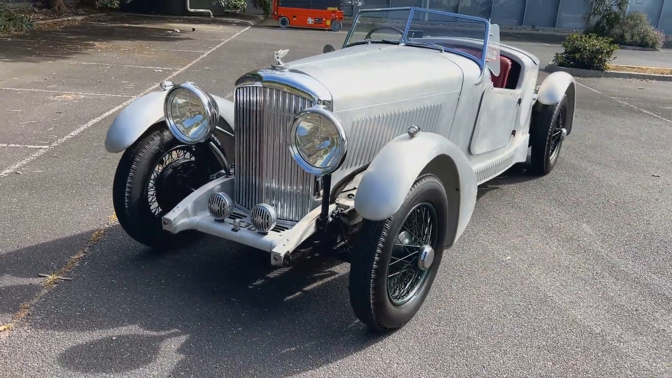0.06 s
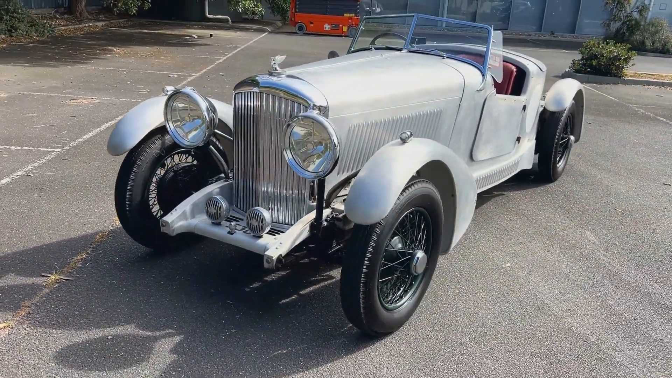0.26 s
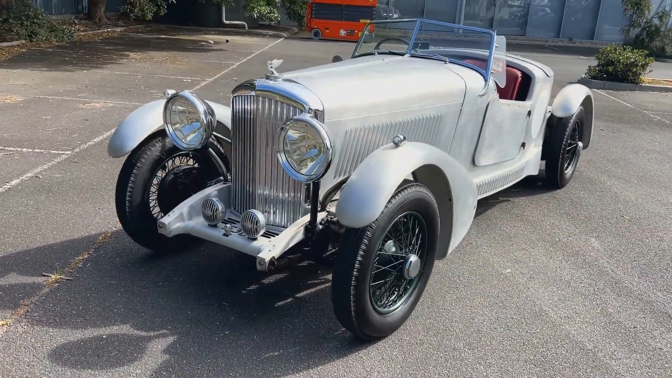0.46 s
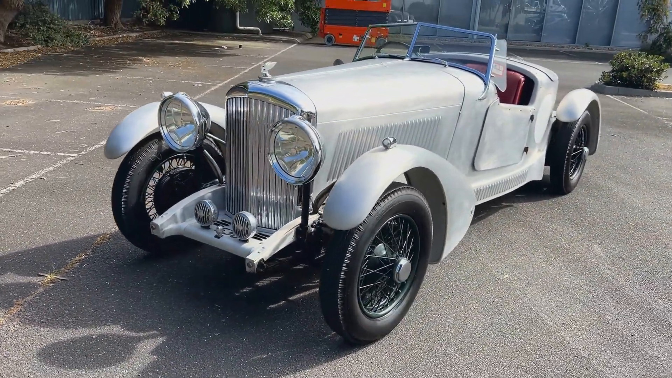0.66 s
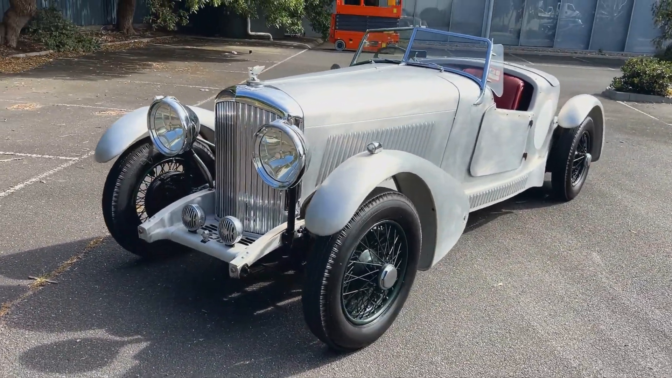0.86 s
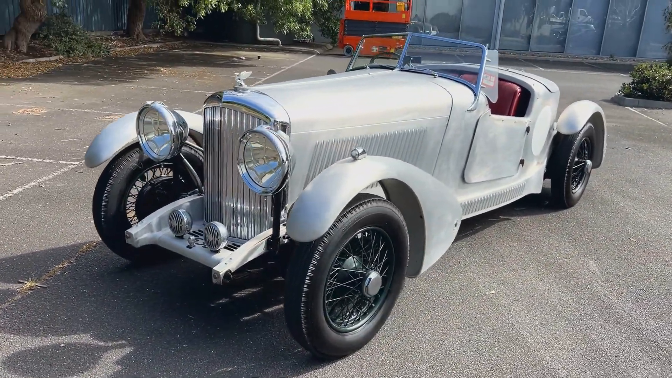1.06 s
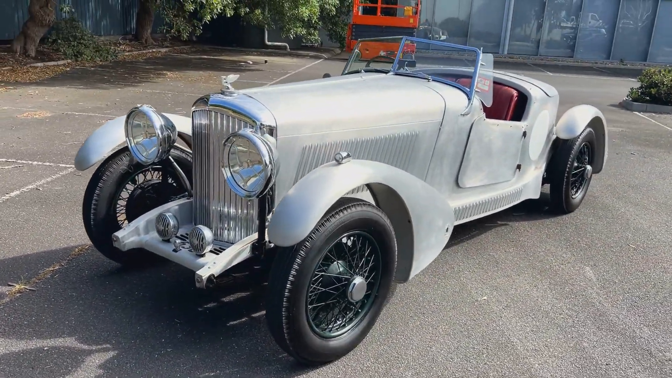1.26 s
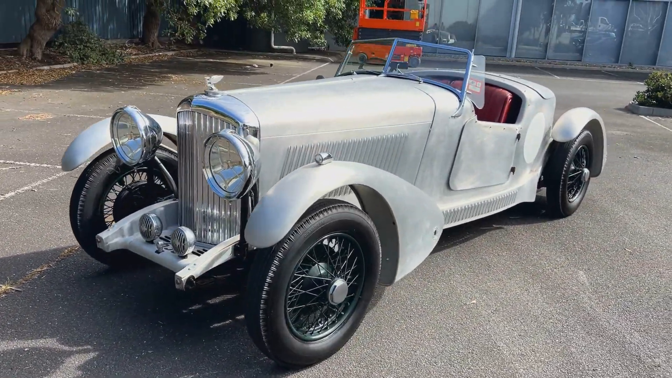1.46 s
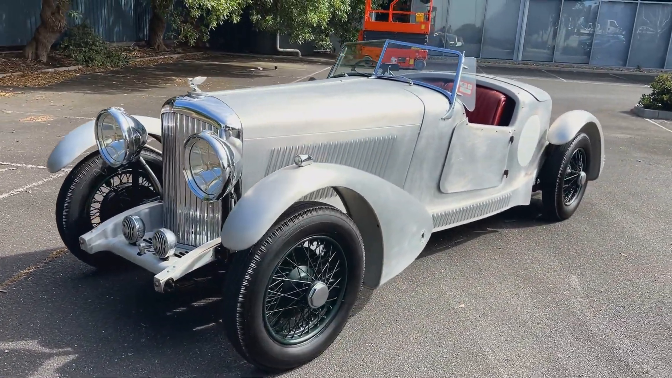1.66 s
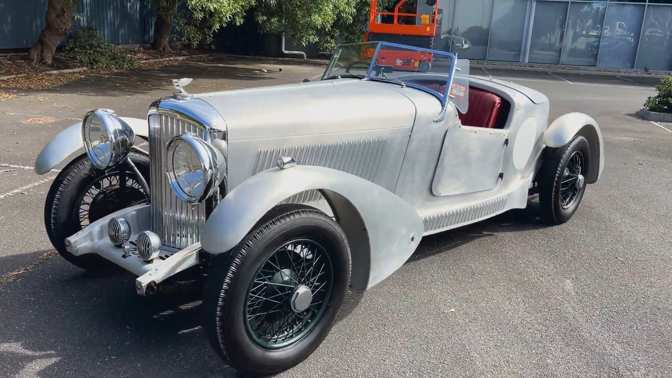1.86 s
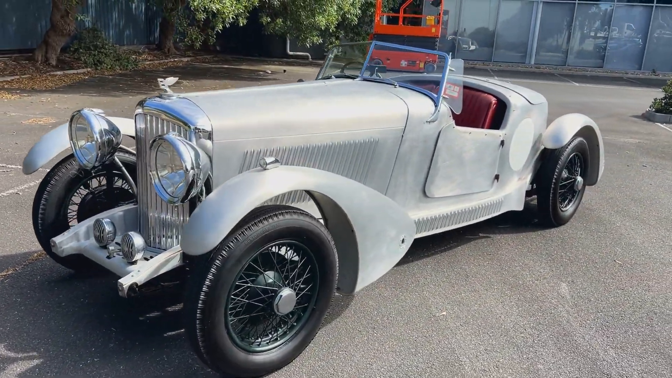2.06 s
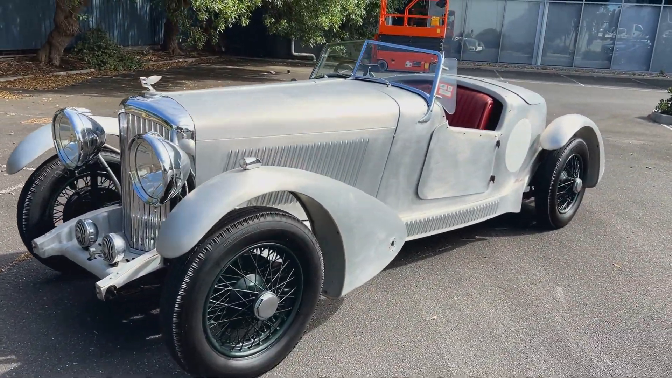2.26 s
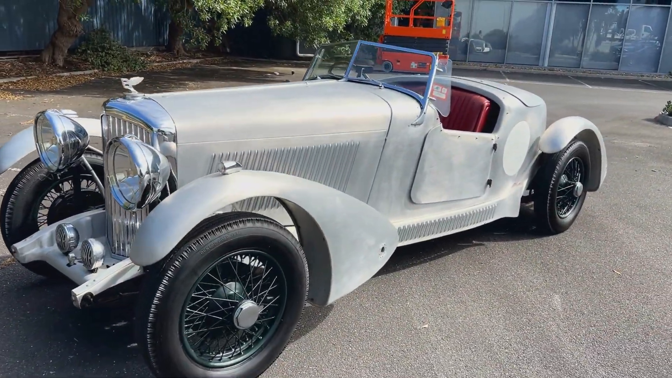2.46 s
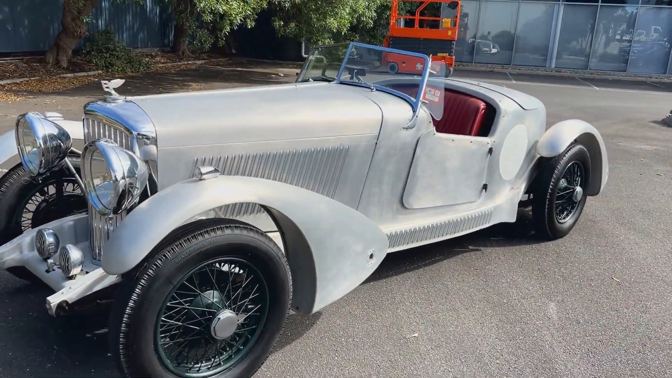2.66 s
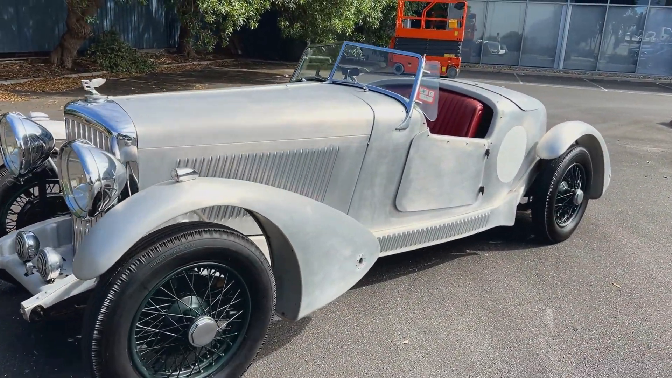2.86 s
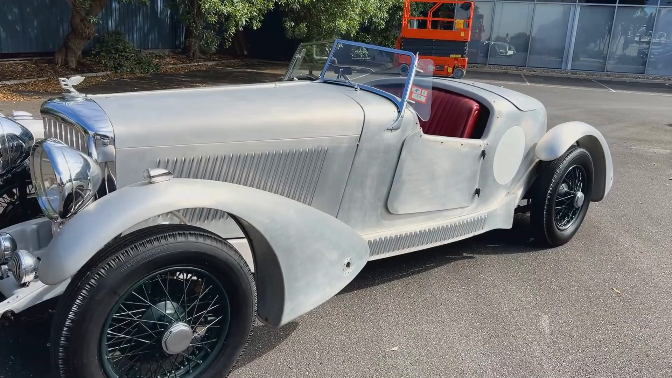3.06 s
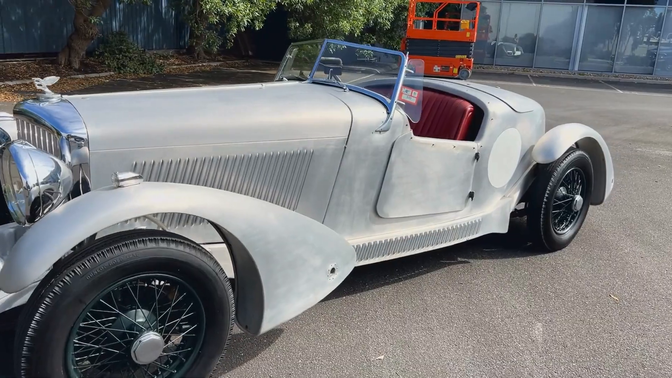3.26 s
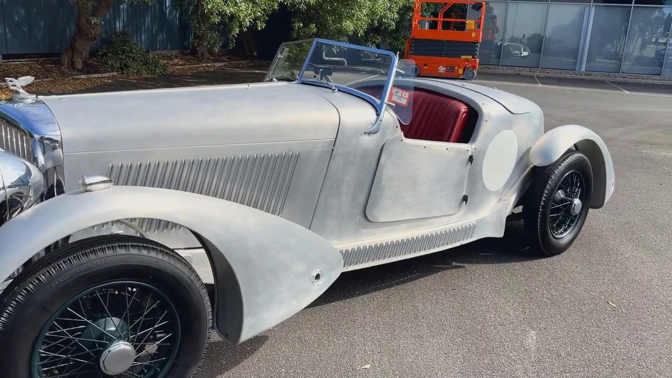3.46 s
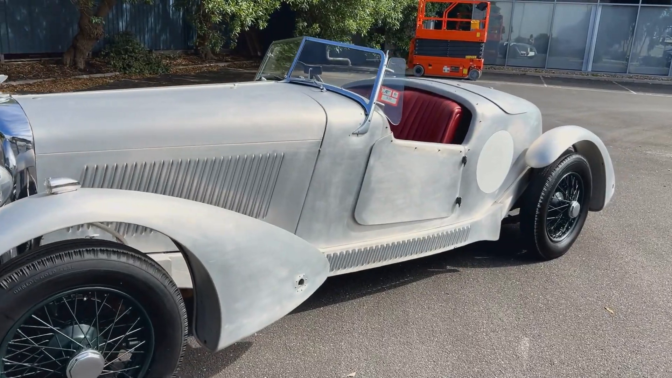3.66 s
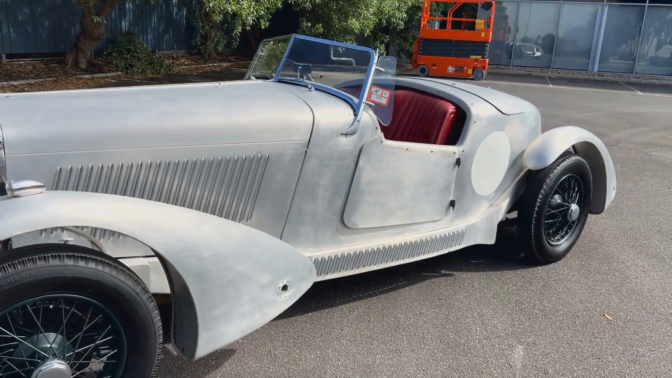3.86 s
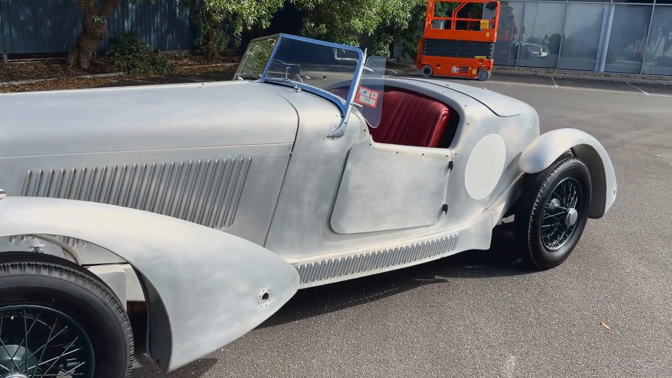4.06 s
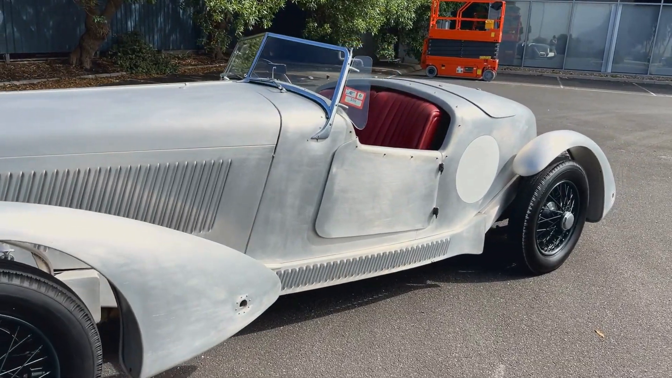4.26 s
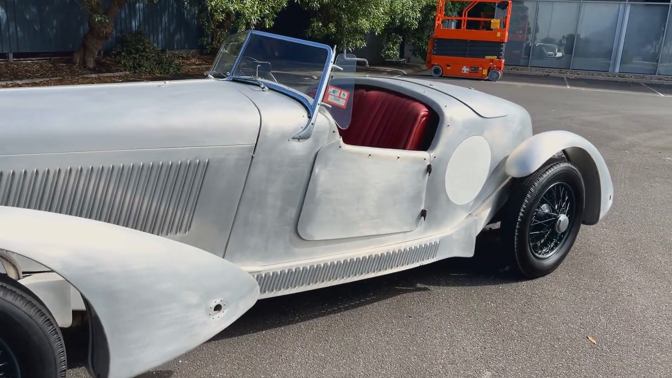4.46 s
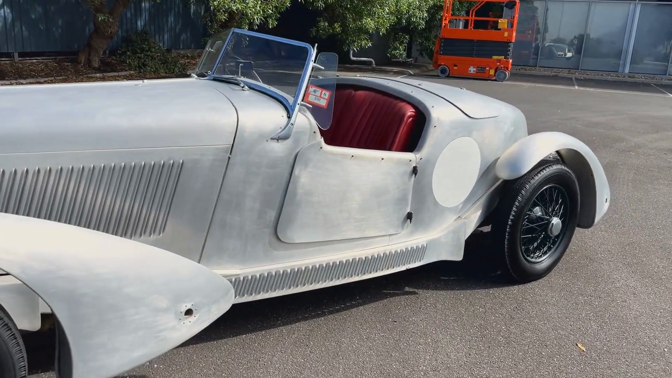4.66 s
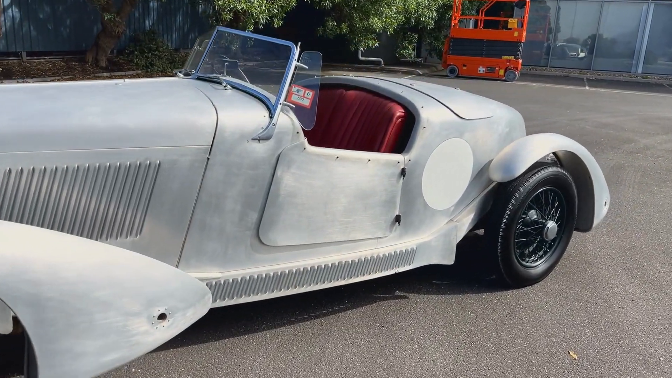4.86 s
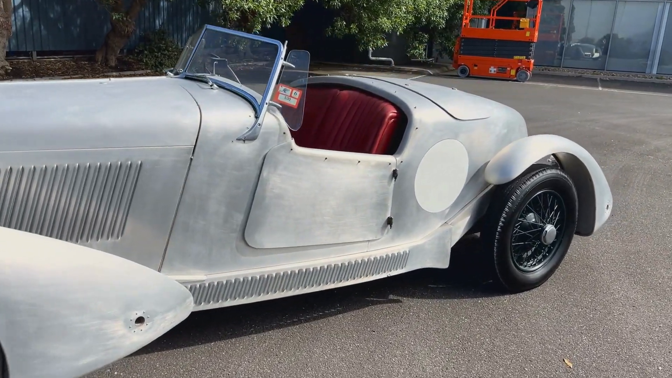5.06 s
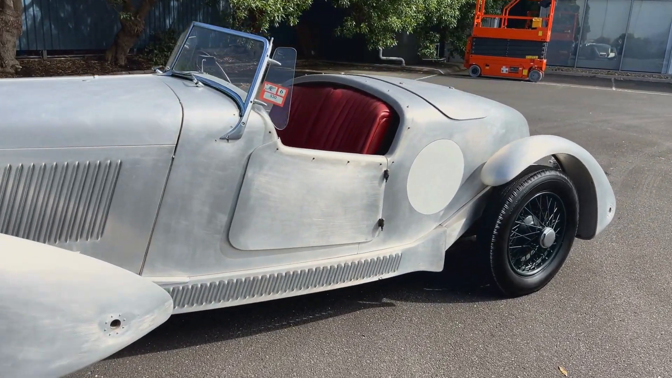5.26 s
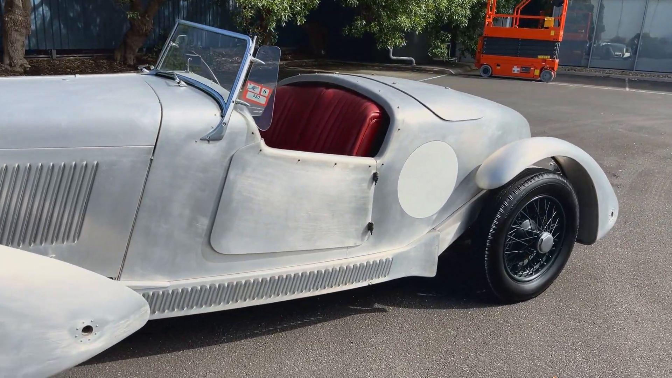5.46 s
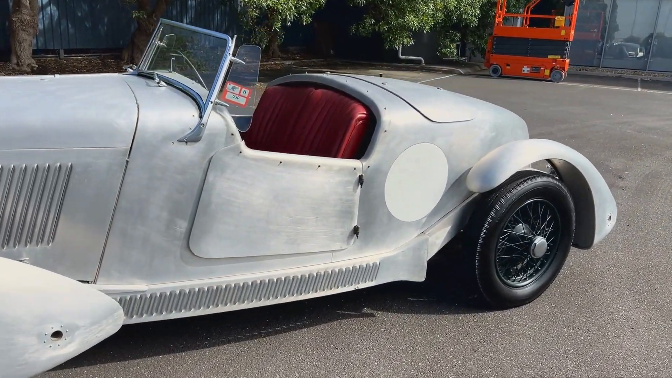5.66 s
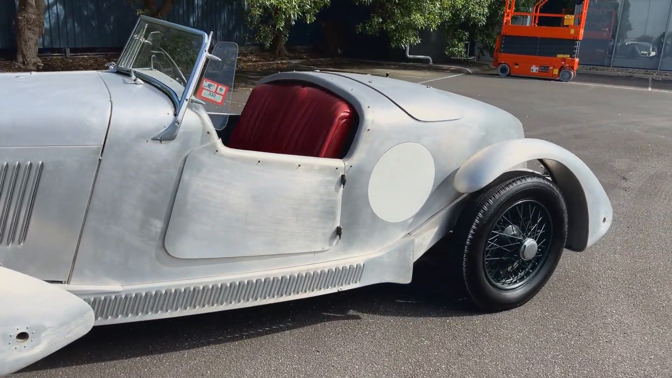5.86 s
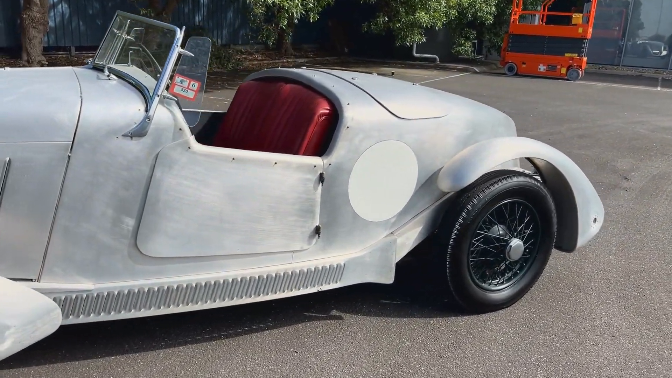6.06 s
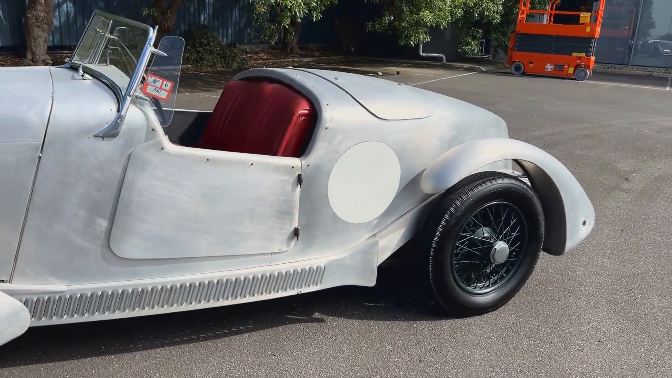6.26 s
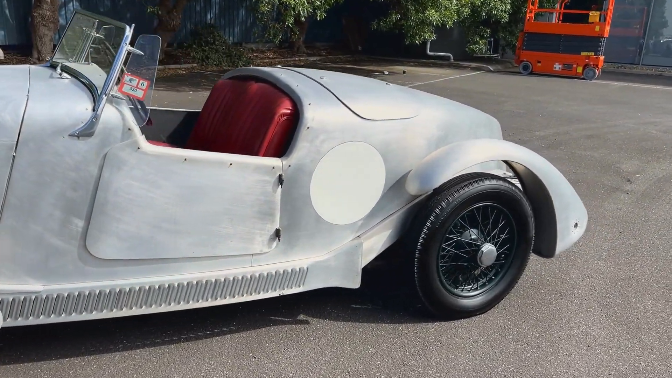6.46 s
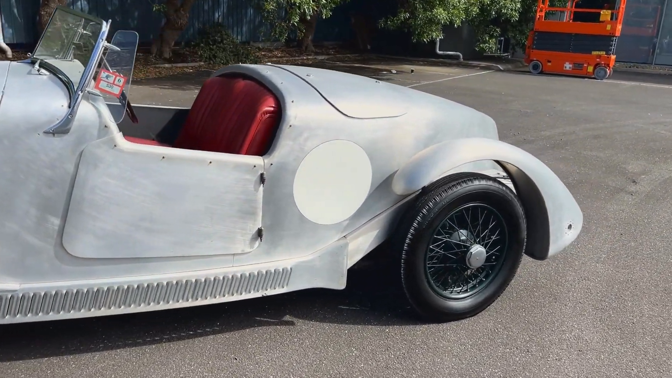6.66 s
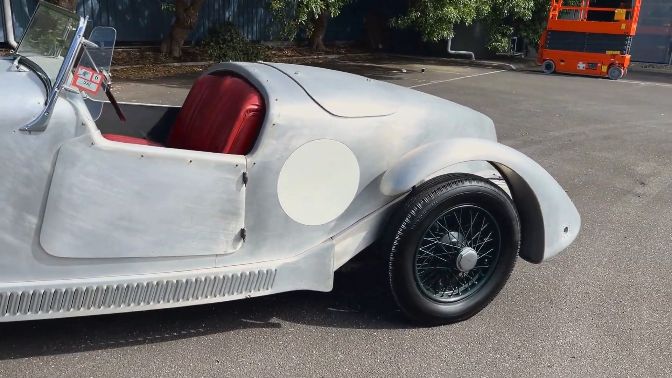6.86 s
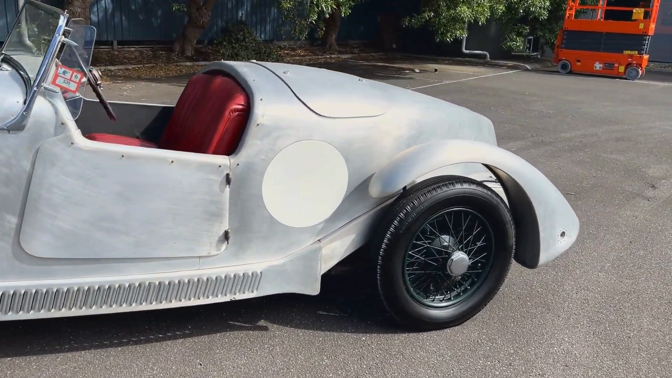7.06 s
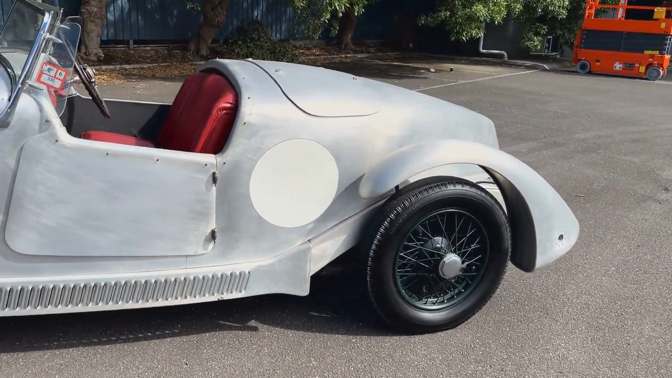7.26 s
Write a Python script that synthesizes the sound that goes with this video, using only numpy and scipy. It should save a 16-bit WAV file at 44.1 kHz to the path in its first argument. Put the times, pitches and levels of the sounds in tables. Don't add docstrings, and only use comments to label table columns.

```python
import sys
import numpy as np
from scipy import signal
from scipy.fft import rfft, irfft, next_fast_len
from scipy.io import wavfile
from scipy.ndimage import map_coordinates

SR = 44100
rng = np.random.default_rng(int(sys.argv[2]) if len(sys.argv) > 2 else 0)


def store_wav(level_fs):
    pcm = np.round(np.clip(np.atleast_2d(level_fs), -1, 1) * 32767)
    wavfile.write(sys.argv[1], SR, pcm.T.astype(np.int16))


def rack_gain(trim_db):
    fader = np.asarray(trim_db, float)
    return 10 ** (fader / 20)


N = 322371


def unit(x):
    return x / np.sqrt(np.mean(x ** 2) + 1e-20)


def along(points, hz):
    f, v = np.transpose(points)
    return np.interp(np.log(hz + 1), np.log(f + 1), v)


def curves(rows):
    s, *columns = np.transpose(rows)
    return [np.interp(np.arange(N) / SR, s, column) for column in columns]


def wobble(rate):
    knots = rng.standard_normal(int(N * rate / SR) + 4)
    return map_coordinates(knots, [np.arange(N) * rate / SR])


def bumps(times, sizes_db, lengths):
    t = np.arange(N) / SR
    events = np.broadcast(times, sizes_db, lengths)
    return sum(db * np.exp(-((t - s) / length) ** 2) for s, db, length in events)


def filtered(x, response):
    m = next_fast_len(N + SR // 2)
    return irfft(rfft(x, m) * response(np.fft.rfftfreq(m, 1 / SR)), m)[..., :N]


def causal(spectrum):
    def response(hz):
        cepstrum = irfft(np.log(rack_gain(along(spectrum, hz)) + 1e-6))
        half = len(cepstrum) // 2
        cepstrum[1:half] *= 2
        cepstrum[half + 1:] = 0
        return np.exp(rfft(cepstrum))
    return response


# (frequency [Hz], correlation [-1 to 1])
PORT_COHERENCE = [(60, 1), (300, 0.98), (640, 0.79), (1100, 0.95), (1900, 1), (4000, 0.97), (7000, 1),
                  (15000, .75)]


def rush(spectrum, gate, alike=PORT_COHERENCE):
    def shape(hz):
        angle = np.arccos(np.clip(along(alike, hz), -1, 1)) / 2
        colour = rack_gain(along(spectrum, hz)) * (hz > spectrum[0][0])
        return colour * [np.cos(angle), np.sin(angle)]

    mid, side = filtered(gate * rng.standard_normal((2, N)), shape)
    return unit(np.array([mid + side, mid - side]))


# (time [s], level [dB])
BREEZE_LEVEL = [(0, -55.5), (1.3, -60), (2.5, -55), (3.3, -51), (5, -49.5), (5.7, -44), (6.5, -41),
                (7.31, -35)]
# (time [s], lift common to both ports [dB], lift differing between ports [dB])
GUST_LIFTS = [(.6, 4, 3), (1.25, 7, -3), (1.8, 7, 5), (2.25, 4, 9), (2.55, 10, 5), (2.85, 11.5, -1),
              (3.05, 10, 3), (3.25, 5, 6), (3.4, 2, 8), (3.65, -1, 8.5), (3.85, -1, 7), (4.13, 4, 16),
              (4.35, 3, -2), (4.46, 4, 6), (4.75, 1, 9), (5.0, 5, 4), (5.25, 13, 3.5), (5.45, 3, 0),
              (5.7, 6, -5), (5.95, 8, -6), (6.15, 9, 6), (6.45, 5, -7), (6.63, 6.5, -6), (6.87, 10, 3),
              (6.95, 5.5, 3), (7.05, 9.5, 5), (7.15, -2, -5)]
# (frequency [Hz], density [dB per Hz])
COMMON_SPECTRUM = [(15, -45), (30, -19), (52, 0), (70, -2), (95, -10), (140, -15), (300, -36), (3000, -120)]
# (frequency [Hz], density [dB per Hz])
DIFFERING_SPECTRUM = [(15, -51.5), (30, -26), (55, -5.5), (75, -8), (110, -6.5), (160, -10), (300, -26.5),
                      (700, -70), (3000, -120)]


def buffeting():
    (breeze_db,), (times, common_lift, differing_lift) = curves(BREEZE_LEVEL), np.transpose(GUST_LIFTS)
    gust_s, differing_db = .07, -0.5
    common_db = breeze_db + bumps(times, common_lift, gust_s)
    differing_db = breeze_db + differing_db + bumps(times, differing_lift, gust_s)
    common = rack_gain(common_db + 5.5) * rush(COMMON_SPECTRUM, rack_gain(3 * wobble(14)), [(50, 1)])
    differing = rack_gain(differing_db + 1.5) * rush(DIFFERING_SPECTRUM, rack_gain(3 * wobble(14)), [(50, -.7)])
    return common + differing


# (time [s], peak level [dB], start frequency [Hz], end frequency [Hz], length [s])
SNAPPING_EDDIES = [(3.032, -29, 430, 90, 0.018), (3.047, -22, 77.5, 54.5, 0.036),
                   (4.732, -43, 452, 150, 0.026), (5.198, -28, 395, 120, 0.016),
                   (5.234, -24, 470, 110, 0.015), (5.954, -32, 90, 50, 0.044),
                   (6.81, -15.5, 540, 93, 0.0187), (6.819, -17.5, 115, 95, .012),
                   (6.865, -20, 80.5, 45.4, 0.037), (6.953, -29, 400, 130, 0.013),
                   (6.975, -24, 395, 109, 0.019), (7.061, -22.5, 500, 110, 0.015)]


def flutter():
    snaps = np.zeros(N + SR)
    for s, db, start_hz, end_hz, length in SNAPPING_EDDIES:
        u = np.arange(round(length * SR)) / (length * SR)
        pitch_hz = start_hz * (end_hz / start_hz) ** u
        swell = np.sin(np.pi * u ** .7)
        snaps[round(s * SR):][:len(u)] += rack_gain(db) * swell * np.sin(-2 * np.pi * np.cumsum(pitch_hz) / SR)
    return snaps[:N]


def yard_echoes(song):
    lag = np.arange(SR // 4) / SR
    echoes = rng.standard_normal((2, len(lag))) * rack_gain(-60 * lag / 0.35) * (lag > .006)
    echoes = echoes[0] + [[.25], [-.25]] * echoes[1]
    response = echoes / np.linalg.norm(echoes[0])
    return rack_gain(-3) * signal.fftconvolve(song[None], response, axes=1)[:, :N]


# (time [s], frequency [Hz], level [dB])
RISING_CHIRPS = [
    [(0.112, 4350, -80.5), (0.13, 4920, -59), (0.15, 6420, -61), (0.159, 6560, -63)],
    [(5.978, 4875, -60), (5.988, 5330, -49), (6.012, 6590, -49.5), (6.015, 6400, -66)],
]
# (multiple of the syrinx pitch, level [dB])
SYRINX_PARTIALS = [(1, -3.5), (2, 0), (3, -17), (4, -22), (5, -24)]
# (time [s], length [s], start frequency [Hz], end frequency [Hz], level [dB])
SHORT_PEEPS = [(0.148, 0.02, 3250, 3300, -53.5), (0.16, 0.012, 3750, 3600, -58),
               (6.006, 0.019, 3170, 3330, -51), (6.018, 0.014, 4060, 3750, -52),
               (6.322, 0.014, 3150, 3600, -48), (6.33, 0.016, 4380, 3930, -49),
               (6.345, 0.0086, 3940, 4350, -51), (6.372, 0.011, 4230, 3860, -58),
               (6.482, 0.012, 4400, 4300, -56), (6.551, .02, 3950, 3830, -54),
               (6.646, .02, 3570, 3740, -57)]


def bird():
    song, t = np.zeros(N), np.arange(N) / SR
    for rows in RISING_CHIRPS:
        hz, db = curves(rows)
        fade = np.clip(np.minimum(t - rows[0][0], rows[-1][0] - t) / 0.0012, 0, 1)
        phase = np.pi * np.cumsum(hz) / SR
        voice = sum(rack_gain(level) * np.sin(k * phase) for k, level in SYRINX_PARTIALS)
        song += fade * rack_gain(db + 6.5 + 1.9 * wobble(220)) * voice
    for s, length, start_hz, end_hz, db in SHORT_PEEPS:
        u = np.clip((t - s) / length, 0, 1)
        cycles = length * u * (start_hz + (end_hz - start_hz) * u / 2)
        song += rack_gain(db) * np.sin(np.pi * u) * np.sin(2 * np.pi * cycles)
    return song + yard_echoes(song)


# (frequency [Hz], density [dB per Hz])
BONNET_SPECTRUM = [(500, -25), (900, -1), (1700, 0), (2150, -6.5), (2380, 1.5), (2600, -8.5), (3500, -22)]


def bonnet():
    return rack_gain(-69.5 + 1.7 * wobble(2.5)) * rush(BONNET_SPECTRUM, 1)


def heard(drone_db, close_db, growth, bonnet_db):
    return np.hypot(rack_gain(close_db + growth * (drone_db + 16)), rack_gain(bonnet_db))


def escape(crank, sizes_db, steady, scatter_db=1.5, lead=0.093, life=0.24):
    firing, part = np.divmod(crank + lead, 1)
    firing = firing.astype(int)
    scatter = scatter_db * rng.standard_normal(N // 900)[firing + 2]
    size_db = np.take(sizes_db, firing, mode="wrap") + scatter
    return steady + rack_gain(size_db) * part / life * np.exp(1 - part / life)


HISS_OF_CYLINDER = [-4.5, 1.5, 0.5, -0.5, 3.5, -7]
# (frequency [Hz], density [dB per Hz])
HISS_SPECTRUM = [(4000, -38.5), (5500, -3.5), (8300, 3), (9300, -6), (9500, 1.5), (9720, 1), (10900, -9.5),
                 (11000, -1), (11150, -6), (12400, -10.5), (15600, -15)]


def hiss(crank, drone_db):
    flow = escape(crank, HISS_OF_CYLINDER, steady=1.3, scatter_db=1.2)
    gain = heard(drone_db, close_db=-57, growth=1.42, bonnet_db=-76.5)
    return gain * rack_gain(-3.0) * rush(HISS_SPECTRUM, flow)


CHUFF_OF_CYLINDER = [4.5, 7.5, 6.5, 9, 6, -1.5]
# (frequency [Hz], density [dB per Hz])
CHUFF_SPECTRUM = [(1200, -6.5), (2000, -8.5), (2150, -2.5), (2390, 2.5), (2620, -2), (2900, -1.5),
                  (3500, -8), (4100, -8), (5000, -14), (6500, -20), (12000, -59)]


def chuffs(crank, drone_db):
    flow = escape(crank, CHUFF_OF_CYLINDER, steady=0.94, scatter_db=1.2)
    gain = heard(drone_db, close_db=-52.5, growth=0.81, bonnet_db=-68)
    return gain * rack_gain(-0.5) * rush(CHUFF_SPECTRUM, flow)


FIRING_STRENGTH = [.5, 1.2, .8, -.6, -1.2, -.4]
# (frequency [Hz], density [dB per Hz])
ROAR_SPECTRUM = [(90, -29), (130, 1.5), (300, -5), (430, -15), (530, -13.5), (700, -21.5), (860, -19.5),
                 (1020, -25), (1280, -27), (1480, -29.5), (1680, -27.5), (1900, -32), (3000, -49),
                 (9000, -100)]


def roar(crank, drone_db):
    flow = escape(crank, FIRING_STRENGTH, steady=6.4, lead=0.13)
    gain = heard(drone_db, close_db=-46.5, growth=0.76, bonnet_db=-68.5)
    return gain * rack_gain(7.5 + 0.78 * wobble(8)) * rush(ROAR_SPECTRUM, flow)


# (frequency [Hz], level [dB])
PIPE_RESONANCE = [(20, -39.5), (33, -39), (67, -17), (84, -3), (100.5, -0.5), (118, -8), (134, -26),
                  (167, -24), (201, -19), (235, -39), (268, -24), (301, -24.5), (335, -41.5), (500, -68.5)]
MODE_EDGES = [84, 185, 250, 285]
# (mean level [dB], swing [dB], crest position [m], crest spacing [m])
STANDING_WAVES = [
    (0, 3.5, 1.35, 3.37),
    (-1.5, 4, 0.046, 3.5),
    (0, 2, 0.57, .78),
    (-4.5, 4.5, 1.1, 5),
]
# (time [s], level [dB], length [s])
INTERFERENCE = [
    [(0, 7, 0.065), (.25, -9, .1), (1.8, 1.5, .15), (2.3, -2.5, 0.27), (3.6, 4, 0.2), (4.35, 0, 0.17),
     (4.8, -7, .12), (5.1, 2, .15), (5.7, -9.5, 0.21), (6.8, 4, 0.11)],
    [(1.3, -5.5, .25), (2.15, -5, 0.057), (5.3, 1, 0.31), (6.93, -19, .09)],
    [(1.3, -9.5, 0.2)],
    [(.9, -1.5, .15), (1.55, 8, 0.3), (2.75, -4, 0.28), (5.35, -5.5, 0.32), (6.2, 5.5, 0.22), (7.1, -7, .2)],
]


def drone(crank, level_db, scatter_db):
    firing = np.floor(crank - 1.015).astype(int)
    at = np.flatnonzero(np.diff(firing)) + 1
    strength_db = np.take(FIRING_STRENGTH, firing[at], mode="wrap")
    pulses = np.zeros(N)
    pulses[at] = rack_gain(strength_db + scatter_db * rng.standard_normal(len(at)))

    def modes(hz):
        lowpasses = [1 / (1 + (hz / edge) ** 24) for edge in MODE_EDGES]
        bands = np.diff([0 * hz, *lowpasses, np.exp(-(hz / 900) ** 2)], axis=0)
        return causal(PIPE_RESONANCE)(hz) * bands

    low, main, second, third, top = unit(filtered(pulses, modes)) / np.sqrt(len(STANDING_WAVES) + 1)
    walked_m = 0.498 * np.arange(N) / SR
    gain = []
    for (mean_db, swing_db, crest, spacing), swells in zip(STANDING_WAVES, INTERFERENCE):
        field_db = mean_db + swing_db * np.cos(2 * np.pi * (walked_m - crest) / spacing)
        gain.append(rack_gain(field_db + 0.9 * wobble(6) + bumps(*np.transpose(swells))))
    late_low = np.roll(low, 95)
    total = gain[0] * late_low + main - gain[1] * second + gain[2] * third + gain[3] * top
    return rack_gain(level_db) * total


# (time [s], firing rate [Hz])
IDLE_SPEED = [(0, 32.49), (.53, 33.76), (1.06, 33.11), (1.76, 34.34), (2.12, 32.6), (2.66, 34.15),
              (2.76, 32.7), (3.37, 33.48), (3.58, 32.72), (3.83, 33.96), (4.41, 32.67), (4.89, 34.49),
              (5.11, 33.81), (5.81, 33.57), (6.3, 34.11), (6.83, 33.96), (6.93, 32.91), (7.31, 33.24)]
# (time [s], level [dB])
DRONE_LEVEL = [(0, -35), (1.2, -31), (2.7, -27.5), (3.7, -24), (4.1, -21.5), (5.1, -18), (6, -17),
               (7.31, -14.5)]
# (time [s], level [dB], length [s])
STUMBLING = [(1.644, -4, 0.043), (2.238, 1, 0.21), (2.571, -3.5, .07), (2.823, -4.5, 0.03),
             (2.996, 0, 0.09), (3.307, -5, 0.044), (3.761, -1.5, .07), (4.119, -1.5, 0.034),
             (4.85, -1.5, .04), (5.21, -4, .018), (5.35, -1.5, 0.064), (6.051, -2.5, 0.054),
             (6.924, -5.5, 0.064), (7.08, 0, .06)]


def engine():
    (rate,), (drone_db,) = curves(IDLE_SPEED), curves(DRONE_LEVEL)
    crank = -1.118 + np.cumsum(rate) / SR
    gas = hiss(crank, drone_db) + chuffs(crank, drone_db) + roar(crank, drone_db)
    hum_db = drone_db + bumps(*np.transpose(STUMBLING)) + .4
    return bonnet() + gas + drone(crank, hum_db, scatter_db=.9)


# (frequency [Hz], phase [rad])
PORT_PHASE = [(50, -.05), (100, -0.21), (250, -.28), (480, 0.25), (750, 0.79), (1100, 0.72), (1800, 0.22),
              (5000, 0.15), (8000, -0.43), (12000, .1)]
# (frequency [Hz], level [dB])
PORT_BALANCE = [(60, -1), (100, 0.5), (300, 0), (700, -1.5), (1100, 2), (1800, 0)]


def scene():
    half = np.array([[.5], [-.5]])

    def ports(hz):
        return rack_gain(half * along(PORT_BALANCE, hz)) * np.exp(1j * half * along(PORT_PHASE, hz))

    wind = buffeting() + flutter()
    return wind + filtered(bird() + engine(), ports)


# (low edge [Hz], high edge [Hz], share of time lost when far, share when near)
TREBLE_GAPS = [(9250, 9455, .6, .45), (9545, 9665, .97, .97), (9790, 10330, .96, .96),
               (10330, 10700, .9, .9), (10700, 10900, .5, .4), (12420, 13080, 0, .75),
               (13800, 14450, 0, .55), (15200, 15800, .95, 0)]


def starved(x):
    hz, t, z = signal.stft(x, SR, nperseg=2048)
    for low, high, far, near in TREBLE_GAPS:
        chance = wobble(18)[np.minimum(t * SR, N - 1).astype(int)]
        rank = np.argsort(np.argsort(chance)) / len(t)
        lost = rank < np.interp(t, [2, 5.5], [far, near])
        z[:, (hz > low) & (hz < high)] *= np.where(lost, rack_gain(-34), 1)
    return signal.istft(z, SR, nperseg=2048)[1][:, :N]


def roll_off(x):
    return signal.sosfilt(signal.butter(12, 15710, fs=SR, output="sos"), x)


def record(dry):
    mix = starved(dry)
    return roll_off(mix)


dry = scene()
out = record(dry)
store_wav(out)
```